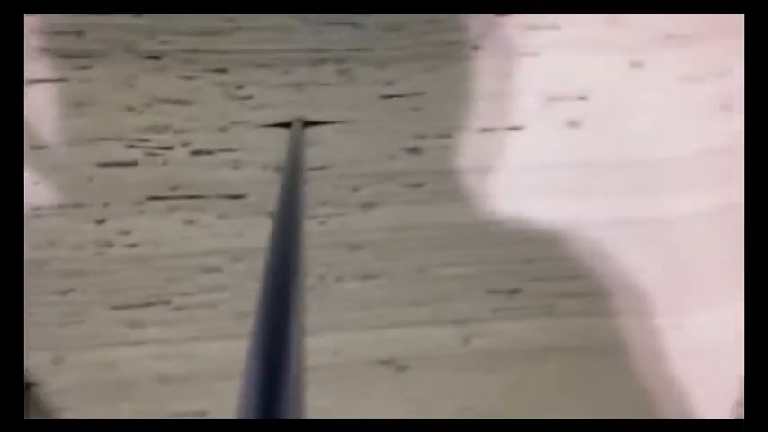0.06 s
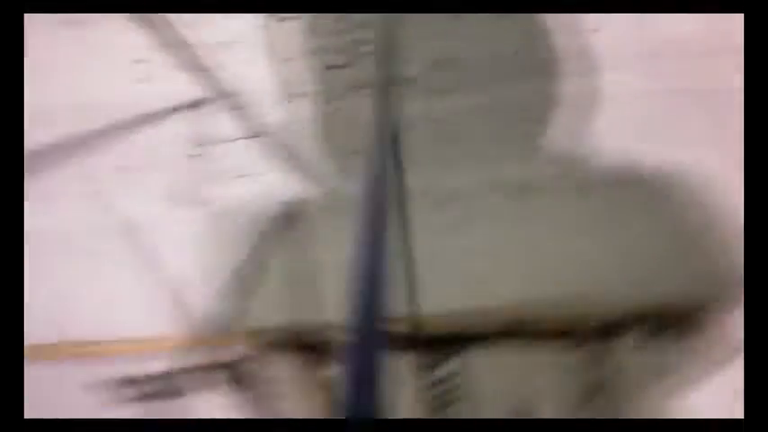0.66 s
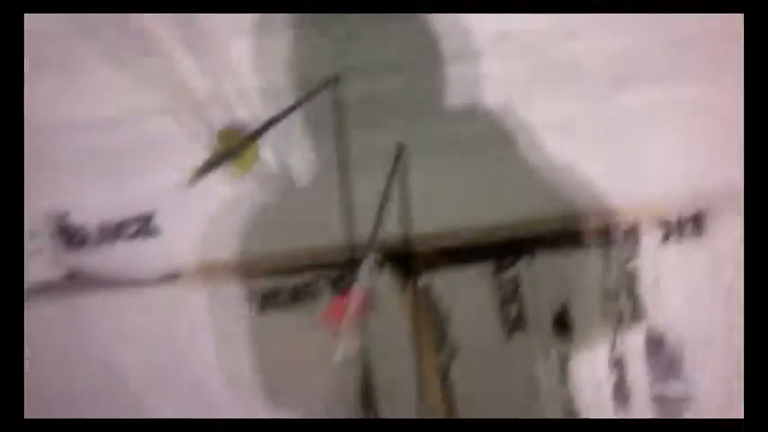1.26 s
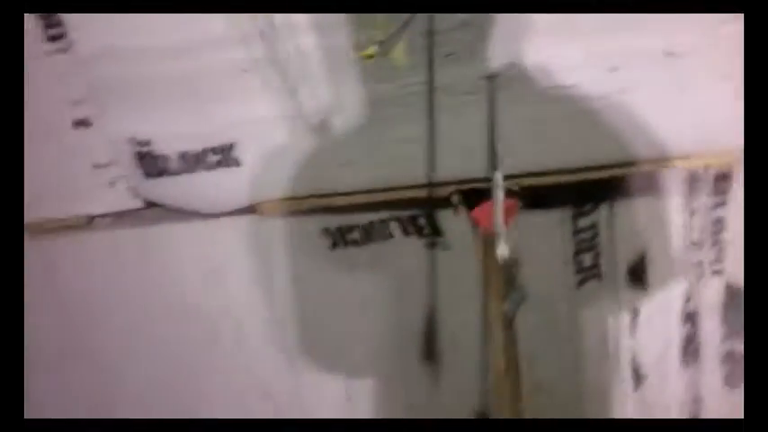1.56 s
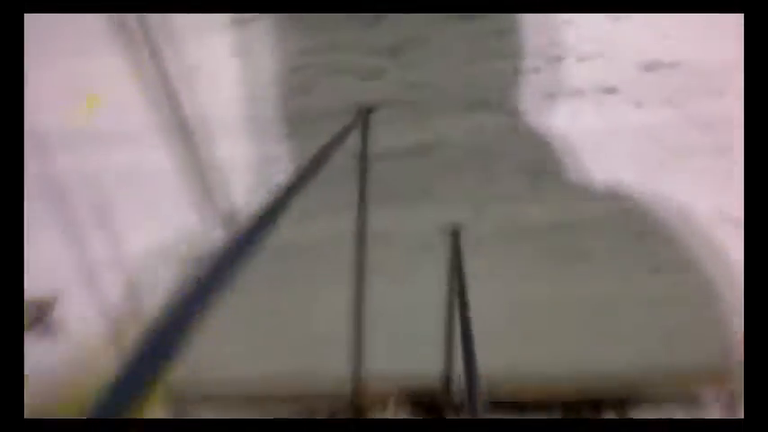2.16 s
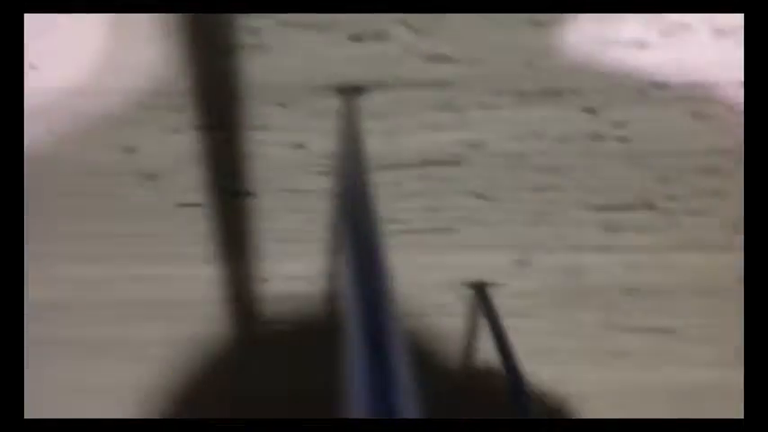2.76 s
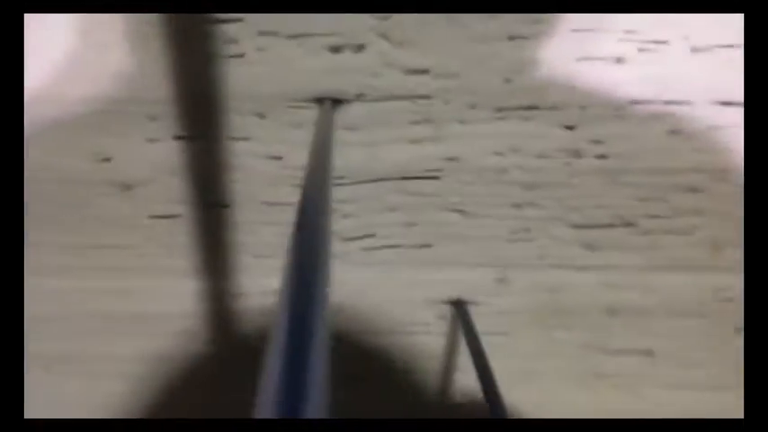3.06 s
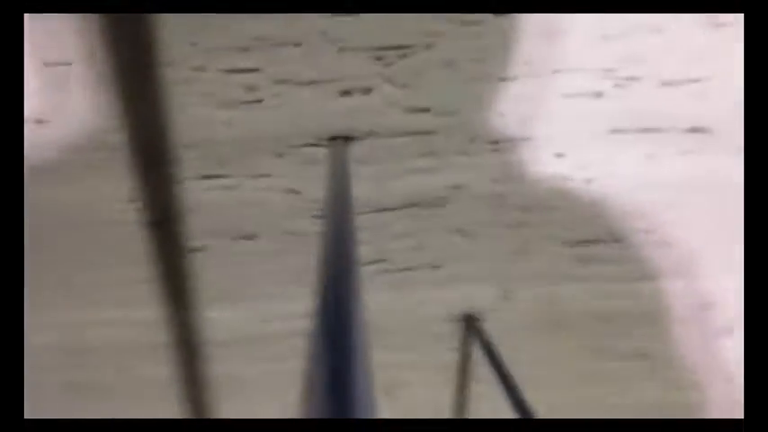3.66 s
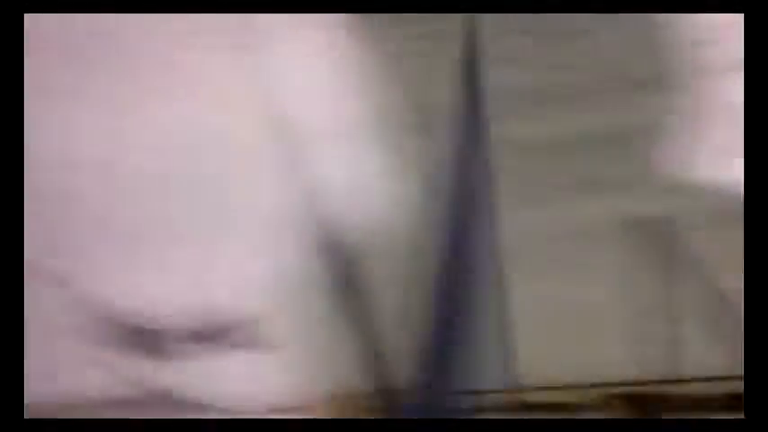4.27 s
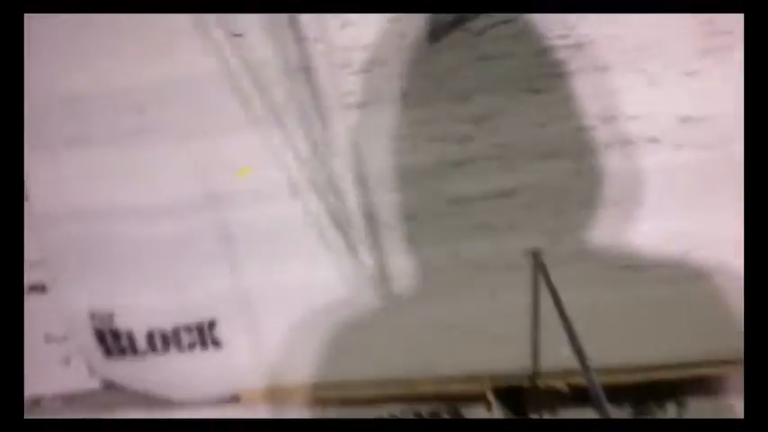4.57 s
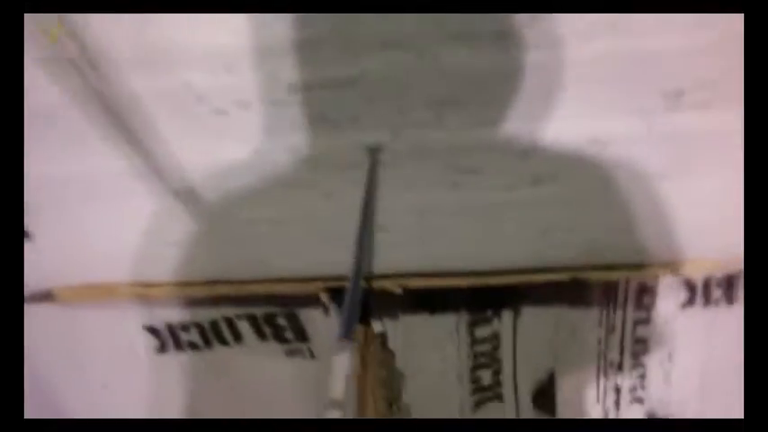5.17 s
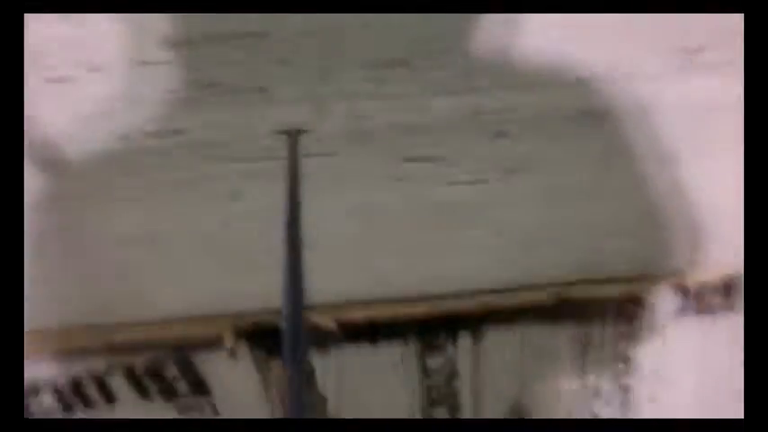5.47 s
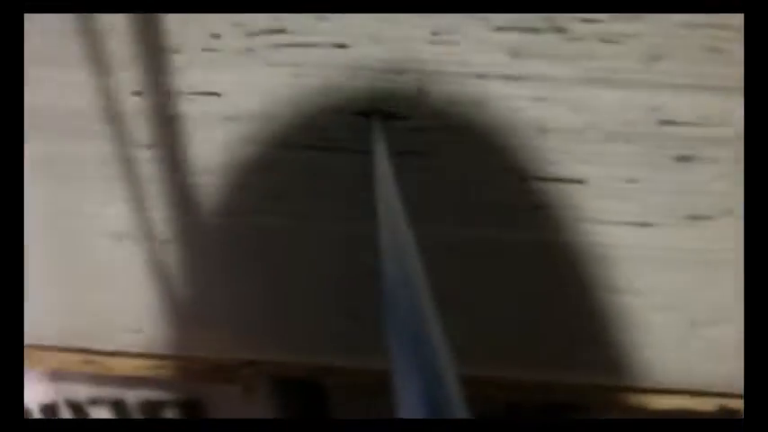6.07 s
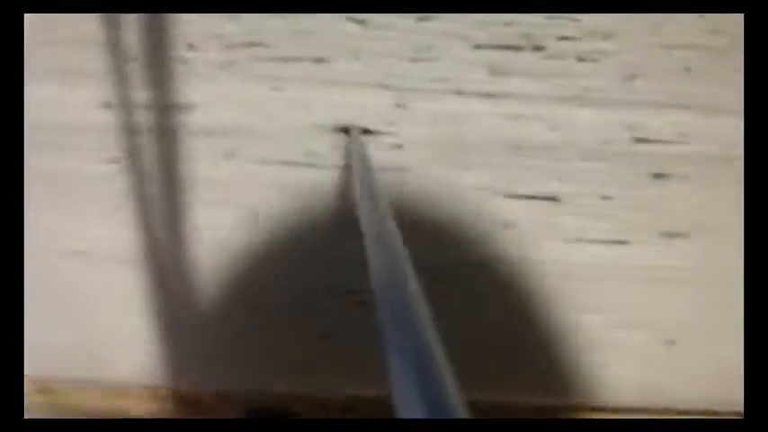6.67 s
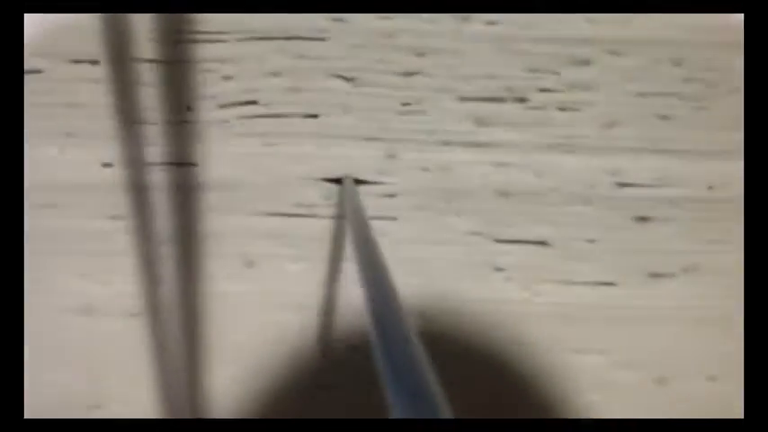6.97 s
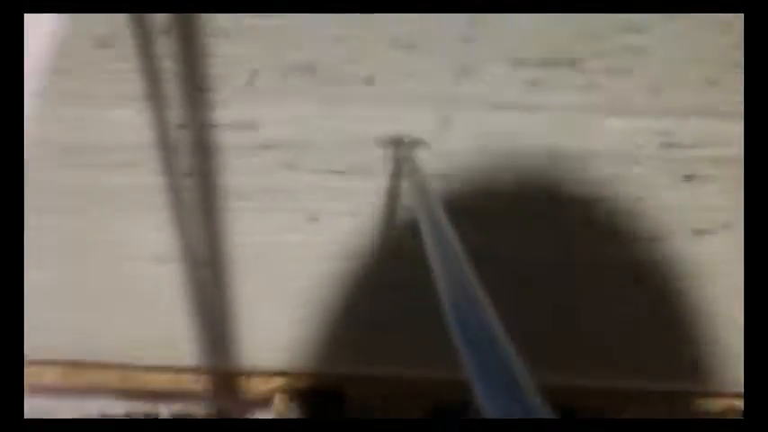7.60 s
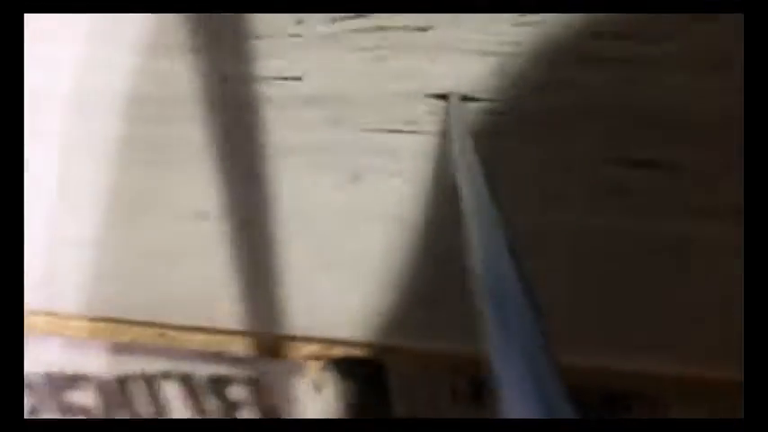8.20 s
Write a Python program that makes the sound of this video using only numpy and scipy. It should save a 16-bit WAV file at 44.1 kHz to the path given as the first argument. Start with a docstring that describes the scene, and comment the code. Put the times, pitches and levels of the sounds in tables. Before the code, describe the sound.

Loose arrow shafts click and slide against each other in a fist, in irregular clusters of sharp ticks and thin hissing scrapes. A sleeve rustles, and a hand rubs, bumps and knocks the handheld microphone. After a quieter stretch, one shaft breaks loose from a foam target with a short rasp at the very end. It all happens an arm's length away in a dry indoor range.

```python
"""Arrows drawn from a foam target

In a dry indoor range, an arm's length from a handheld camera, loose shafts click and slide in the fist:
impact and friction excite their modes. The hand bumps, taps and rubs the camera, and sleeves rustle.
At the end a shaft breaks loose and rasps through the foam by stick-slip friction."""
import sys
import numpy as np
from scipy import signal
from scipy.fft import rfft, irfft, next_fast_len
from scipy.io import wavfile
from scipy.ndimage import uniform_filter1d

SR = 44100
rng = np.random.default_rng(int(sys.argv[2]) if len(sys.argv) > 2 else 0)


def waveform_to_disk(signal):
    """Save audio, clipped to [-1, 1], as 16-bit WAV at the path in sys.argv[1]."""
    frames = np.transpose(np.atleast_2d(signal))
    scaled = np.clip(frames, -1, 1) * 32767
    samples = np.round(scaled).astype(np.int16)
    wavfile.write(sys.argv[1], SR, samples)


N = 367794
TIME, HIT_TIME = np.arange(N) / SR, np.arange(8192) / SR

# Spectral envelopes. Each row: frequency in Hz, relative gain in dB.
AIR_SPECTRUM = [(20, -26.5), (60, 2.5), (200, -6.5), (900, -12), (2200, -17.5), (4600, -21), (8000, -26.5),
                (12500, -35)]
PALM_SPECTRUM = [(20, -20.5), (40, -12), (65, 1.5), (100, -4.5), (160, -3), (280, -8.5), (450, -14.5),
                 (900, -29.5)]
SLEEVE_SPECTRUM = [(150, -21.5), (400, -2), (650, -1), (1050, -3), (1600, -5.5), (2200, -1), (3000, -9.5),
                   (5000, -24)]
SLIDE_SPECTRUM = [(900, -31), (2200, -13), (3300, -4), (4600, 2), (5600, 1), (7000, -10), (9000, -23),
                  (13000, -37)]
HISS_SPECTRUM = [(4500, -31), (7500, 2.5), (9500, 7.5), (12500, -2.5)]
KNOCK_SPECTRUM = [(80, -10), (500, -5), (1100, -7), (1700, 1.5), (2800, -10.5), (4000, -1), (7000, -10.5),
                  (12500, -16.5)]
CLICK_SPECTRUM = [(80, -24), (300, -35), (750, -33.5), (1300, -16.5), (2400, -6), (4600, -2.5), (6500, -3),
                  (8000, -9), (12500, -15)]
THUD_SPECTRUM = [(50, -4), (170, 3), (300, -4), (550, -3), (1100, -23.5), (3000, -45.5)]
REVERB_SPECTRUM = [(200, -2), (1500, -2), (5000, -2.5), (11000, -2.5)]
# Modes of camera shell and shafts. Each row: frequency in Hz, relative level in dB, T60 in seconds.
SHELL_MODES = [(442, -9.5, 0.039), (620, -12.5, 0.012), (919.5, -19.5, 0.057), (1570, -3, 0.061),
               (1705, -11, .04), (1810, -5, 0.037), (2128, -2.5, 0.051), (3600, -3.5, .035),
               (3760, -7, 0.04), (4500, -26.5, 0.035), (6460, -14, 0.055)]
ARROW_MODES = [(1436, -19.5, 0.057), (2466, -6, 0.034), (2900, -15, 0.075), (3368, -10.5, .03),
               (3892, -0.5, 0.027), (4430, -5, 0.057), (4880, -6, 0.022), (6010, 0.5, 0.026),
               (6720, -8.5, 0.015), (9000, -12, 0.0088), (10670, -7, 0.015)]
# Resonances of the gripped shaft. Each row: frequency in Hz, bandwidth in Hz, gain in dB.
GRIPPED_RESONANCES = [(3100, 180, -3), (3790, 590, 7.5), (4007, 240, 6), (8800, 780, 0), (9900, 330, -8),
                      (11540, 450, -24.5)]
# Arm movements. Each row: peak time, swell and fade in seconds, then relative levels in dB
# of sliding, hiss and sleeve.
ARM_STROKES = [(.27, .7, 0.32, -69, -80, -60), (0.529, 0.21, 0.1, -46.5, -56, -43),
               (.65, 0.19, 0.081, -46, -55.5, -50), (.77, .15, 0.074, -44.5, -54.5, -48),
               (.885, 0.042, 0.052, -65, -75.5, -70.5), (1.11, 0.077, 0.17, -53, -62, -52.5),
               (1.271, 0.086, 0.09, -48, -51.5, -49.5), (1.38, 0.1, 0.13, -39, -45, -47),
               (1.52, 0.14, 0.079, -45, -53, -55), (1.62, 0.11, 0.14, -49.5, -57.5, -55.5),
               (1.77, 0.098, 0.11, -32.5, -43.5, -46.5), (1.9, 0.23, 0.16, -53.5, -64, -53),
               (2.27, .07, 0.26, -72, -71.5, -77.5), (2.47, .13, 0.24, -47.5, -58.5, -49),
               (2.81, 0.18, .12, -47.5, -54.5, -49), (3.04, 0.085, 0.046, -40.5, -48.5, -49.5),
               (3.15, 0.27, 0.078, -70, -72, -58.5), (3.269, 0.056, 0.065, -57.5, -78, -61),
               (3.571, 0.051, 0.23, -60.5, -69, -60), (3.84, 0.15, 0.1, -56.5, -71, -56.5),
               (4.17, 0.55, 0.6, -58, -61.5, -51), (4.279, 0.25, 0.36, -40.5, -49.5, -47),
               (4.49, .05, .22, -56, -65, -56.5), (4.628, 0.056, 0.19, -52, -64, -54),
               (4.86, 0.096, 0.33, -40.5, -51, -55), (5.02, 0.19, 0.095, -42, -57, -52.5),
               (5.17, .1, 0.11, -71, -85, -68), (5.25, .04, 0.051, -59, -67, -61),
               (5.43, .12, 0.053, -60, -67, -61.5), (5.54, 0.025, 0.058, -59, -76, -60.5),
               (5.62, 0.038, 0.069, -58.5, -74, -62.5), (5.81, 0.058, 0.13, -57.5, -68, -62.5),
               (6.11, 0.15, 0.14, -48.5, -58, -53.5), (6.28, 0.14, 0.068, -49, -62, -56),
               (6.509, 0.1, 0.066, -51, -57.5, -57.5), (6.63, 0.088, 0.086, -60.5, -70.5, -60),
               (6.82, 0.047, 0.082, -68.5, -84, -61), (6.97, .08, 0.093, -71.5, -88.5, -66),
               (7.09, 0.067, 0.18, -73, -87.5, -69), (7.35, 0.2, 0.18, -66, -81, -64.5),
               (7.47, .05, 0.042, -74.5, -82.5, -82), (7.78, 0.17, 0.29, -68, -86, -64.5),
               (8.11, .09, 0.067, -62, -79, -65), (8.29, 0.15, .3, -43.5, -54.5, -44.5)]
# Rumble of the palm. Each row: time in seconds, level in dB for a sleeve level of 0 dB.
PALM_LEVELS = [(0, -18.5), (.4, -15.5), (1.2, -22.5), (1.6, -16), (2.1, -23.5), (2.95, -16.5), (3.7, -17),
               (4.3, -17), (5.1, -22.5), (6.55, -16), (7.2, -21.5), (8.34, -18)]
# Soft bumps of the hand. Each row: start in seconds, relative level in dB, pitch in Hz.
HAND_BUMPS = [(.165, -26, 121), (.216, -42, 71.8), (0.545, -32.5, 112), (0.699, -34.5, 278),
              (1.128, -42, 252), (2.666, -26.5, 188), (2.741, -17, 163), (2.742, -20, 205),
              (2.758, -20, 71.5), (2.886, -44, 121), (3.076, -36.5, 99), (3.245, -48, 132),
              (3.561, -19, 147), (3.575, -30, 61.5), (3.768, -41.5, 103), (3.813, -28.5, 157.4),
              (3.833, -34, 144), (3.943, -29.5, 132), (4.305, -29, 88), (4.319, -37.5, 73),
              (4.331, -37.5, 167), (5.361, -38, 101), (5.665, -43.5, 120), (5.73, -48, 128.6),
              (5.975, -30.5, 110.5), (6.295, -42.5, 161), (6.57, -43.5, 85.5), (6.824, -46.5, 91),
              (7.32, -45, 187), (8.295, -32, 76.74), (8.316, -32.5, 134)]
# Taps on the camera. Each row: start in seconds, relative level in dB, gain up to 2.1 kHz in dB.
SHELL_TAPS = [(.164, -26.5, -15), (.222, -43, 14), (.542, -28, -22), (0.699, -27, 13), (2.667, -15.5, -3),
              (2.694, -27, -6), (2.737, -1, -2), (2.741, -10.5, 6.5), (2.756, -9, 0.5), (2.769, -15, -5.5),
              (2.886, -21, -3), (3.561, -18.5, -8.5), (3.812, -32.5, 1.5), (3.943, -32, -10.5),
              (5.365, -47, 0.5), (5.53, -48, -8), (5.601, -36, -7), (5.665, -35, -9.5), (5.731, -36, -7),
              (5.78, -48, -5), (5.881, -28.5, -0.5), (5.974, -29, -9.5), (6.632, -39, 4),
              (6.824, -41.5, -10), (6.954, -43.5, 7), (7.328, -42.5, 4), (7.343, -42.5, -2),
              (7.503, -51, -6), (7.582, -50, -4), (8.177, -26.5, 0), (8.194, -35, 6)]
# Short rubs. Each row: peak time and half length in seconds, level in dB, centre and bandwidth in Hz.
SHORT_RUBS = [(.41, 0.061, -53.5, 646, 99), (0.482, 0.031, -43, 560, 220), (.492, .017, -42, 2510, 200),
              (0.713, 0.025, -42, 1967, 209.4), (0.727, 0.07, -51, 1620, 351),
              (1.421, .02, -55.5, 521, 200), (2.471, 0.022, -46, 775, 304),
              (2.472, 0.027, -46.5, 1350, 900), (2.797, 0.036, -44, 5300, 1500),
              (3.593, .04, -60.5, 3900, 250), (3.028, 0.026, -37, 4600, 403.5),
              (4.249, 0.02, -40.5, 575, 215), (4.33, .02, -42, 4670, 899),
              (4.628, 0.019, -41.5, 5400, 1300), (4.803, 0.011, -43.5, 4750, 350),
              (4.867, 0.032, -44.5, 4600, 397.2), (6.132, .029, -53, 2000, 901.5),
              (6.502, 0.031, -50, 3650, 744), (7.48, .14, -82.5, 922, 29.9), (7.9, .16, -78.5, 1984, 130.5),
              (8.3, 0.12, -50, 1970, 131)]
# Shaft strikes shaft. Each row: start in seconds, level in dB, then relative body (up to 1.8 kHz),
# brightness (from 8.8 kHz) and after-ring in dB, buzz frequency in Hz.
SHAFT_IMPACTS = [(.4547, -31.5, 17.5, -9.5, -6.5, 3660), (.5479, -32, 1.5, 4.5, 12.5, 3960),
                 (.6109, -11.5, -2, 3, -2, 4390), (.7755, -34.5, 6, 3, 4, 4900),
                 (.9902, -45, 7, -6.5, 32, 5100), (1.0953, -28.5, -3, -1, 1, 5000),
                 (1.1127, -34.5, 4.5, -1, 11, 4680), (1.1243, -33.5, -6.5, 0.5, 6, 5100),
                 (1.1859, -35.5, -3.5, -11.5, 5, 5500), (1.2329, -30, -2, -6.5, 15.5, 5600),
                 (1.2512, -12, 0.5, 1.5, 1.5, 5730), (1.3275, -13.5, -5.5, -3, -3, 5370),
                 (1.3381, -17, 0, -1.5, 4.5, 5500), (1.341, -11.5, 0, -4.5, 7, 5350),
                 (1.5874, -19.5, -2.5, -4, 3.5, 4990), (1.6679, -29.5, -1.5, -16, -9.5, 4940),
                 (1.7078, -29, 5, -12.5, 12, 5200), (1.7416, -20.5, -1, -6, 16, 4600),
                 (1.7785, -26.5, -4, 8, -13, 5400), (1.8061, -16.5, -5, -10, -8, 3900),
                 (1.8393, -25, 2, -25, 5, 4400), (1.8923, -19, 1.5, -8, 1.5, 3910),
                 (2.3416, -42.5, 4, 6, 6, 4250), (2.4915, -30, -1, 3.5, 1, 4400),
                 (3.0595, -33.5, 8, -12.5, -0.5, 4700), (3.1313, -8.5, 0, 7, -22, 4600),
                 (3.1512, -17.5, -1.5, 3, -16, 4720), (3.1635, -31, 0.5, -5, 1, 4630),
                 (3.2678, -42, -7, -9, -15, 4620), (4.2676, -26, 10, 7, 4, 4030),
                 (4.3162, -27, -7, -1.5, -6.5, 4260), (4.3738, -9.5, -7, 9.5, -8, 4680),
                 (4.4011, -33.5, 6, -26, 1.5, 3620), (4.4431, -36.5, 10, -8, 3, 3980),
                 (4.4951, -24, -3, -4.5, -7.5, 4430), (4.5531, -35.5, 6.5, -9, 5.5, 4500),
                 (4.6763, -36, 2.5, -12, -0.5, 4700), (4.7574, -12.5, -3.5, -4.5, 13.5, 4800),
                 (4.8113, -26.5, 4, -25.5, -7, 4490), (4.8414, -8.5, -8.5, 3.5, -1.5, 4480),
                 (4.8551, -21.5, 3.5, -7.5, 3, 4680), (4.903, -14, -3, 5, -12, 4240),
                 (4.9279, -24.5, -1.5, -6, 10, 5310), (4.9902, -26.5, 0, -2, 1, 4940),
                 (5.0309, -24, -13, -12, -1, 4730), (5.0612, -34, 1, 0, 9, 4700),
                 (5.2275, -29, -6, -5, 6, 4300), (5.2503, -29.5, -2, -13, -12, 4540),
                 (5.42, -42.5, -8, -1, -16, 3870), (6.0757, -24, -2, -10.5, 1.5, 4920),
                 (6.0873, -10, -3, 4, -8.5, 4320), (6.1092, -20, -0.5, -1.5, -1, 3880),
                 (6.1222, -27, -2, -9.5, 18, 3870), (6.2698, -23.5, -3, -9, -32, 4200),
                 (6.4102, -33.5, 8, 1, -4, 4180), (6.4259, -29, 10, 5.5, 2.5, 4105),
                 (8.2356, -27, 3, 5, -12, 3780)]
# The drag through the foam. Each row: time in seconds, level in dB, nominal slips per second.
FOAM_DRAG = [(8.228, -68, 530), (8.235, -30.5, 790), (8.25, -31.5, 740), (8.266, -28, 550),
             (8.286, -34, 700), (8.297, -40, 420), (8.34, -45.5, 620)]


def undb(db):
    """Amplitude grows tenfold every 20 dB."""
    return 10 ** (np.asarray(db) / 20)


def unit(x):
    """Normalisation to an rms of 1."""
    return x / np.sqrt(np.mean(x ** 2) + 1e-18)


def at_level(x, db):
    """Short-time rms: the loudest two milliseconds are set to a level."""
    return x * undb(db) / np.sqrt(uniform_filter1d(x ** 2, size=88).max())


def add(out, start, sound):
    """Superposition of a sound from its start in seconds."""
    i = max(int(start * SR), 0)
    out[i:i + len(sound)] += sound[:max(N - i, 0)]


def colour(x, spectrum):
    """Minimum-phase filtering: folding the cepstrum makes the response causal."""
    size = next_fast_len(len(x) // 2 + 512, True) * 2
    hz, db = np.transpose(spectrum)
    bin_hz = np.arange(size // 2 + 1) * SR / size
    gain = undb(np.interp(np.log(bin_hz + 1), np.log(hz), db))
    cepstrum = irfft(np.log(gain))
    cepstrum[1:size // 2] *= 2
    cepstrum[size // 2 + 1:] = 0
    return irfft(rfft(x, size) * np.exp(rfft(cepstrum)))[:len(x)]


def resonate(x, resonances):
    """Forced response of parallel resonators."""
    return sum(undb(db) * signal.lfilter(*signal.iirpeak(hz, hz / width, SR), x)
               for hz, width, db in resonances)


def wander(rate):
    """Random modulation: `rate` values a second, joined by lines, with a spread near 1."""
    steps = rng.standard_normal(4096)
    return np.sqrt(2) * np.interp(TIME * rate, np.arange(len(steps)), steps)


def decay(t60):
    """Exponential damping, 60 dB in t60 seconds."""
    return np.exp(-np.log(1000) * HIT_TIME / t60)


def ring(modes, detune, scatter_db):
    """Free vibration of damped modes; each contact point shifts and weights them anew."""
    out = np.zeros(len(HIT_TIME))
    for hz, db, t60 in modes:
        weight, shift, polarity = rng.standard_normal(3)
        tone = np.sign(polarity) * np.sin(2 * np.pi * hz * (1 + detune * shift) * HIT_TIME)
        out += undb(db + scatter_db * weight) * decay(t60) * tone
    return out


def friction_noise(rate, spread_db, smooth):
    """Shot noise: tiny slips of unequal size, `rate` a second, over smooth rubbing."""
    size = undb(spread_db * np.minimum(rng.exponential(size=N), 5))
    slips = (rng.random(N) < rate / SR) * size * rng.choice([-1, 1], N)
    return unit(unit(slips) + smooth * rng.standard_normal(N))


def background(air_db=-75.5, whine_db=-94, whine_hz=11107):
    """The noise floor: broadband room air and a pure tone from the camera's electronics."""
    air = unit(colour(rng.standard_normal(N), AIR_SPECTRUM)) * undb(air_db)
    return air + np.sqrt(2) * undb(whine_db) * np.sin(2 * np.pi * whine_hz * TIME)


def room(x, wet_db, t60):
    """Reverberation: absorption by the foam wall leaves a faint diffuse tail after the direct sound."""
    t = TIME[:SR]
    envelope = np.exp(-np.log(1000) * t / t60) * (1 - np.exp(-t / .012))
    tail = colour(rng.standard_normal(SR) * envelope, REVERB_SPECTRUM)
    return x + undb(wet_db) * signal.fftconvolve(x, tail / np.linalg.norm(tail))[:N]


def arm_levels(drop_db=19, resting_db=-88):
    """Incoherent strokes add in power, giving the dB curves of sliding, hiss and sleeve."""
    t = TIME[::32]
    power = np.full((3, len(t)), 1e-14)
    for peak, swell, fade, *levels in ARM_STROKES:
        distance = np.abs((t - peak) / np.where(t < peak, swell, fade))
        power += undb(np.array(levels)[:, None] - drop_db * distance ** 1.15) ** 2
    power[2] += undb(resting_db) ** 2  # the sleeve never lies quite still
    return [np.interp(TIME, t, 10 * np.log10(p)) for p in power]


def sleeve_rustle(sleeve_db, catch_db):
    """Friction of cloth gives midrange noise that flutters as it catches and lets go."""
    slips = friction_noise(rate=900, spread_db=2, smooth=.68) * undb(catch_db + .4 * wander(28))
    return unit(colour(slips, SLEEVE_SPECTRUM)) * undb(sleeve_db - 3.5)


def palm_rumble(sleeve_db):
    """Friction of the palm on the camera gives a rumble that grows as the arm moves."""
    level_db = np.interp(TIME, *np.transpose(PALM_LEVELS)) + .71 * sleeve_db
    slips = friction_noise(rate=180, spread_db=3, smooth=.97) * undb(wander(25))
    return unit(colour(slips, PALM_SPECTRUM)) * undb(level_db)


def hand_bumps(resonance_hz=160, width_hz=18):
    """A soft impact thuds; the held camera then rocks, longest near its own resonance."""
    out = np.zeros(N)
    for start, db, hz in HAND_BUMPS:
        t60 = .065 + .07 * np.exp(-((hz - resonance_hz) / width_hz) ** 2)
        rocking = ring([(hz, 0, t60), (70, -14, .09)], detune=.0061, scatter_db=5.5)
        thud = colour(rng.standard_normal(len(HIT_TIME)) * decay(.027), THUD_SPECTRUM)
        bump = at_level(rocking, 0) + at_level(thud, -.86)
        add(out, start, at_level(bump, db - 5.5))
    return out


def shell_knocks():
    """Impact excites the modes of the camera's plastic shell; harder taps ring it more."""
    out = np.zeros(N)
    for start, db, body_db in SHELL_TAPS:
        chatter = rng.standard_normal(len(HIT_TIME)) * (decay(.013) + undb(-23.5) * decay(.09))
        modes = ring(SHELL_MODES, detune=.012 - .00041 * min(db, 0), scatter_db=5.5)
        knock = at_level(colour(chatter, KNOCK_SPECTRUM), 0) + at_level(modes, .45 * db - 1.5)
        # each spot has its own colour, and the shell dulls the top
        knock = colour(knock, [(2100, body_db), (3300, 0), (5500, 0), (8000, -3.5)])
        add(out, start, at_level(knock, db - 9))
    return out


def rasps():
    """Forced resonance: dense slips drive one narrow band while a short rub swells and dies."""
    out = np.zeros(N)
    slips = friction_noise(rate=1200, spread_db=3.5, smooth=.5)
    for peak, half, db, hz, width in SHORT_RUBS:
        span = np.abs(TIME - peak) < 3 * half
        envelope = np.exp(-((TIME[span] - peak) / half) ** 2)
        band = [(hz, 1.5 * width, 0)]  # two passes narrow it to about `width`
        out[span] += unit(resonate(resonate(slips[span], band), band)) * envelope * undb(db)
    return out


def sliding_shafts(slide_db, hiss_db, catch_db):
    """Sliding friction hisses and drives the shafts' modes, which come and go as the contact travels."""
    slips = friction_noise(rate=1100, spread_db=1.5, smooth=.86) * undb(catch_db)
    singing = sum(resonate(slips, [(hz, 160, db)]) * undb(3.5 * wander(18))
                  for hz, db, _ in ARROW_MODES if hz < 8000)
    slide = unit(unit(colour(slips, SLIDE_SPECTRUM)) + undb(-5) * unit(singing))
    fine_slips = (slips + rng.standard_normal(N)) * undb(catch_db + wander(100))
    hiss = unit(colour(fine_slips, HISS_SPECTRUM))
    return slide * undb(slide_db - 2) + hiss * undb(hiss_db)


def light_touches(slide_db, per_second=22):
    """A Poisson process of faint contacts that follow the sliding level; rows as in SHAFT_IMPACTS."""
    chance = rng.random((300, 5))
    starts = np.cumsum(-np.log(chance[:, 0]) / per_second)
    levels = np.interp(starts, TIME, slide_db) + 4
    return [(start, db + 8 * size, 3.5, -14 + 16 * bright, 6 * loose, 3800 + 1500 * place)
            for start, db, (_, size, bright, loose, place) in zip(starts, levels, chance)
            if start < TIME[-1]]


def shaft_clicks(impacts):
    """A hard impact snaps and chatters, then the shafts buzz and ring in damped free vibration."""
    out = np.zeros(N)
    for start, db, body_db, top_db, ring_db, hz in impacts:
        noise = rng.standard_normal((2, len(HIT_TIME)))
        chatter = noise[0] * (undb(8) * decay(.0013) + decay(.017) + undb(ring_db - 22) * decay(.07))
        crack = colour(chatter, CLICK_SPECTRUM)
        rattle = noise[1] * (decay(.0071) + undb(ring_db - 19.5) * decay(.053))
        buzz = resonate(rattle, [(hz, 230, 0)])
        modes = ring(ARROW_MODES, detune=.025, scatter_db=0)
        click = at_level(crack, 0) + at_level(buzz, -1.6) + at_level(modes, .5 * ring_db - 7.5)
        # a glancing touch is bright, a square one has more body
        click = colour(click, [(1800, body_db), (3200, 0), (6800, 0), (8800, top_db + 2.5)])
        add(out, start, at_level(click, db))
    return out


def foam_pull():
    """Stick-slip motion: every slip in the foam tears a puff of noise that rings the shaft."""
    times, db, rate = np.transpose(FOAM_DRAG)
    slip_hz = np.interp(TIME, times, rate) * undb(2.2 * wander(300))
    phase = np.cumsum(slip_hz) / SR % 1
    puffs = rng.standard_normal(N) * np.exp(-phase / .51) * undb(2 * wander(180))
    return unit(resonate(puffs, GRIPPED_RESONANCES)) * undb(np.interp(TIME, times, db, left=-150))


def scene():
    """All sources superpose at one microphone, which feeds both channels."""
    slide_db, hiss_db, sleeve_db = arm_levels()
    events = shaft_clicks(SHAFT_IMPACTS) + shell_knocks() + hand_bumps() + rasps() + foam_pull()
    floor = background()
    catch_db = 2 * wander(70)  # shafts and sleeve catch and let go together
    sliding = sliding_shafts(slide_db, hiss_db, catch_db)
    handling = sleeve_rustle(sleeve_db, catch_db) + palm_rumble(sleeve_db)
    ticks = shaft_clicks(light_touches(slide_db))
    mono = floor + handling + sliding + ticks + room(events, wet_db=-31, t60=.16)
    return np.array([mono, mono])


def record(dry):
    """Band limiting: the camera thins the deepest bass and cuts the top steeply."""
    thinned = signal.sosfilt(signal.butter(2, 48, "high", fs=SR, output="sos"), dry)
    return signal.sosfilt(signal.ellip(10, .2, 70, 12480, fs=SR, output="sos"), thinned)


dry = scene()
out = record(dry)
waveform_to_disk(out)
```